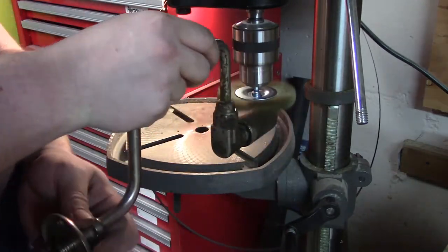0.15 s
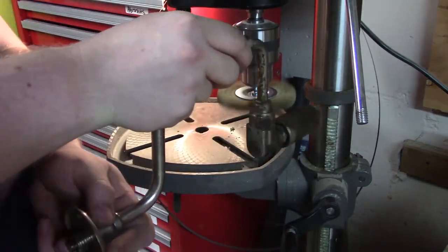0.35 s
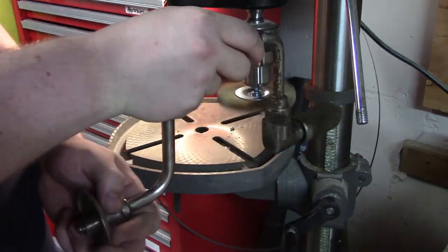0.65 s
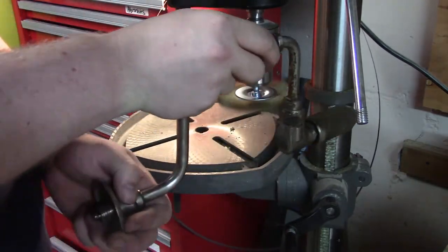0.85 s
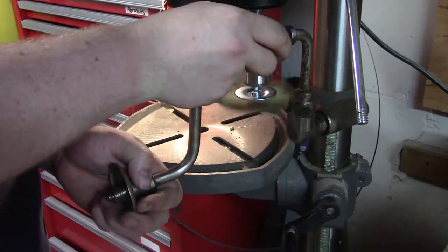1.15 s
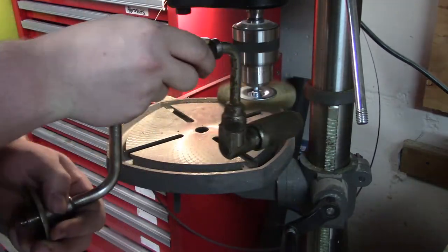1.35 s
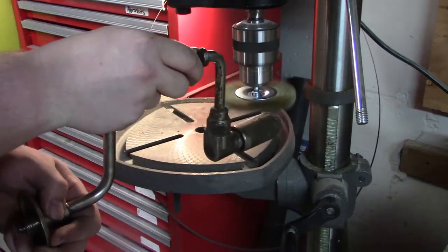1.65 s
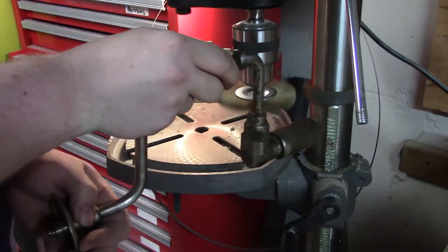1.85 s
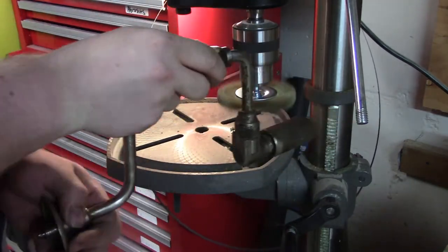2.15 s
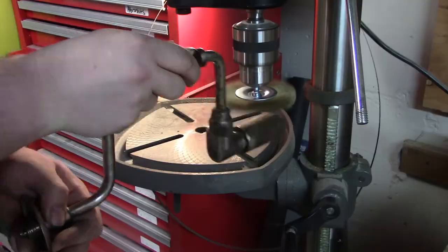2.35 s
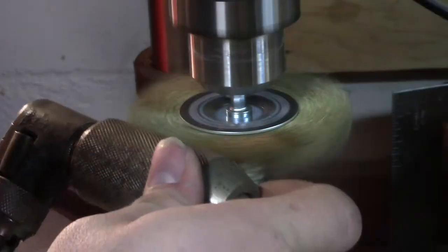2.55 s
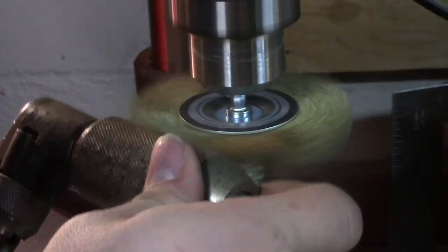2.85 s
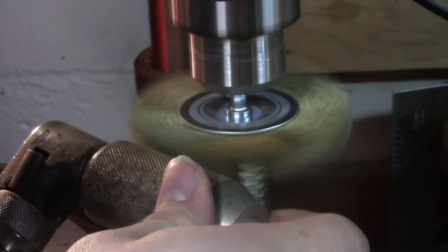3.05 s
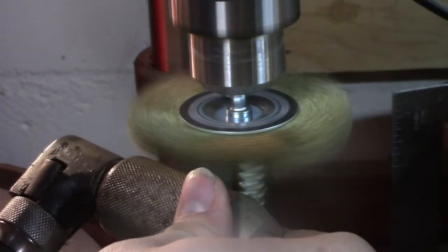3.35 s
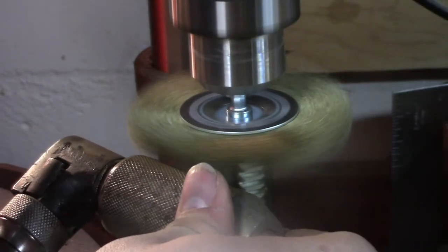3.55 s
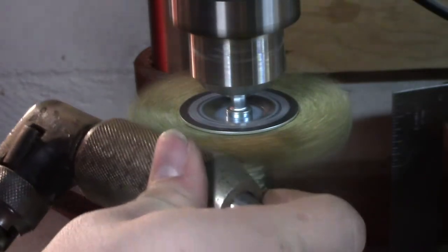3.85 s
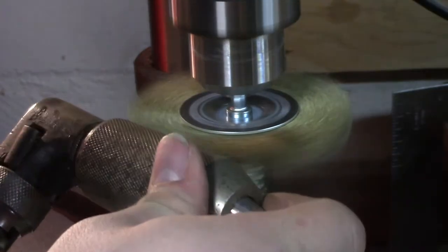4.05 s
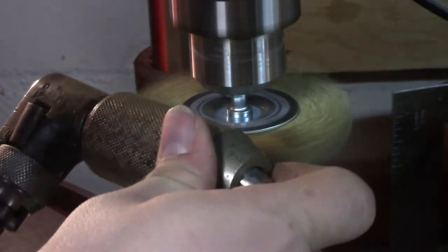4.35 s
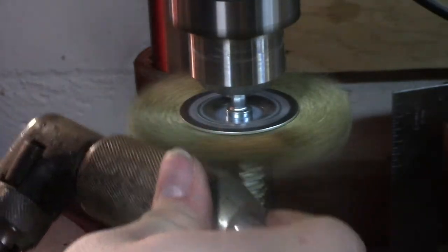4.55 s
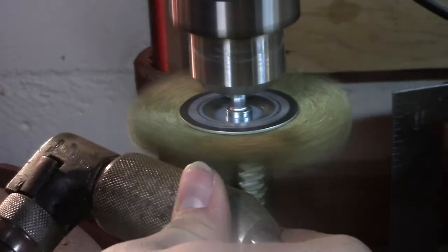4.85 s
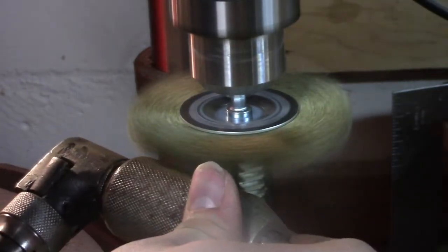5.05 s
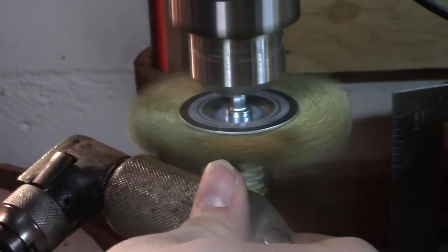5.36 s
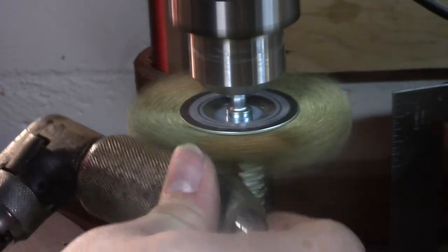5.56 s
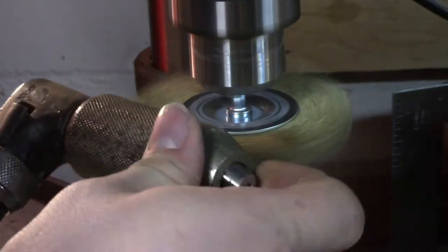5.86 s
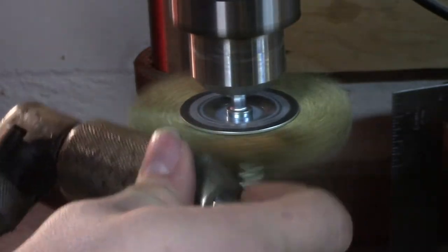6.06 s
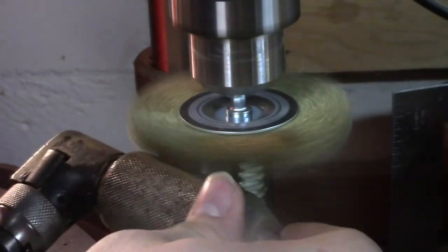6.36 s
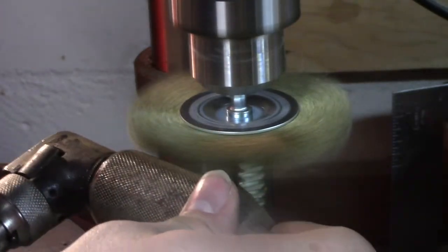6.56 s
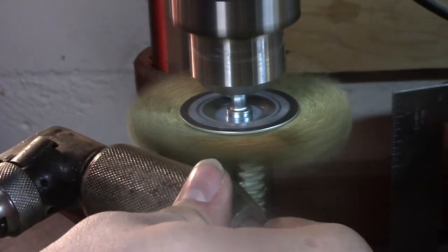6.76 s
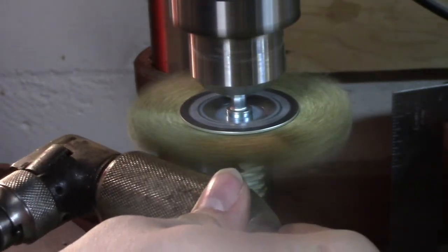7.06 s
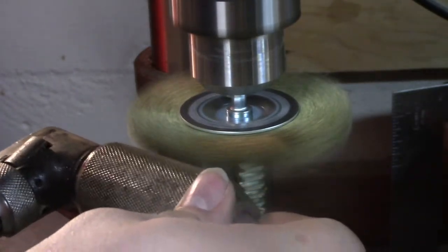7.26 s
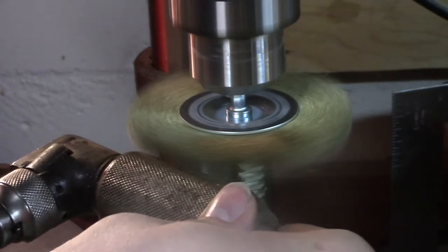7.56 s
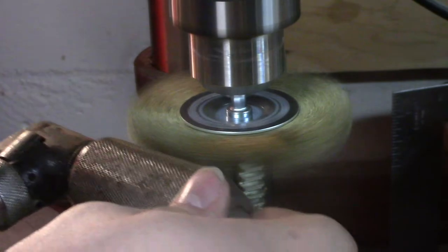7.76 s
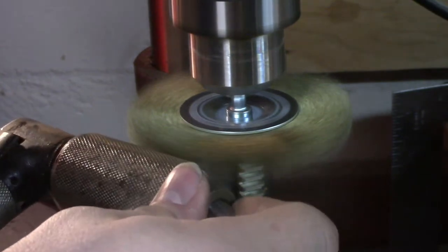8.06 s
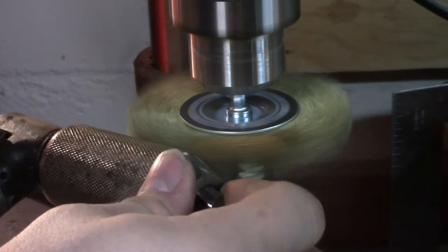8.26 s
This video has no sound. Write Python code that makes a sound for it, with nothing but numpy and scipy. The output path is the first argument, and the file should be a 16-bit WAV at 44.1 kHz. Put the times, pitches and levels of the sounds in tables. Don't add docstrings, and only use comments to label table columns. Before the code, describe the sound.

From 0 to 2.5 s, a drill press with a spinning brush wheel against a steel tool is heard sped up almost five times: a loud, shrill, dense metallic rattle and whirr, strongest around 3 to 5.5 kHz, with fluttering surges, brief dips and small hard ticks. At 2.5 s it cuts instantly to normal speed, closer, lower and softer. Contact is light until about 2.7 s, then the uneven wheel knocks rapidly, roughly thirty turns a second, making the frame hum, head rattle and chuck clatter beneath a bright bristle hiss. The scraping thins near 2.9, 4.1, 4.6 and 5.6 s; shoves swell the rattle around 4.4, 6.0, 6.8 and 7.35 s. At 6.2 s contact nearly lifts, then returns rougher. A very faint high whistle comes and goes, clearer near 8 s. It continues, slightly eased, to the end at 8.4 s, with short workshop echo.

```python
import sys
import numpy as np
from scipy import signal
from scipy.fft import rfft, irfft
from scipy.io import wavfile
from scipy.ndimage import uniform_filter1d, map_coordinates

SR = 44100
rng = np.random.default_rng(int(sys.argv[2]) if len(sys.argv) > 2 else 0)


def dump_mix(stems):
    frames = np.atleast_2d(stems).T
    limited = np.clip(frames, -1, 1)
    pcm = np.round(limited * 32767).astype(np.int16)
    wavfile.write(sys.argv[1], SR, pcm)


def volts_from_decibels(level):
    exponent = np.asarray(level, float) / 20
    return 10 ** exponent


N = 370440
TIME = np.arange(N) / SR
CUT_S = 2.506
LAPSE = 4.83
LAPSE_TOOL_HZ = 5780

# pitch in Hz, width in Hz, level in dB.
LAPSE_HEAD_MODES = [(1890, 120, -14), (2165, 50, -10.5), (2330, 100, -16), (2460, 70, -14),
                    (2888, 35, -6.5), (3194, 105, -6), (3465, 99, -5), (3880, 130, -13), (4120, 40, -13),
                    (4192, 35, -11), (4396, 70, -.5), (4520, 120, -6), (4738, 28, -8), (5098, 60, -4),
                    (5265, 75, -7), (5494, 35, -8), (5620, 80, -15), (6140, 81, -14), (6480, 245, -14),
                    (6880, 162, -12), (7710, 45, -15), (7930, 125, -18), (8400, 77, -14), (8860, 543, -16),
                    (9320, 109, -14), (9430, 62, -14), (10210, 95, -17), (11670, 231, -23),
                    (12210, 45, -17), (12630, 70, -18), (13600, 234, -27), (14090, 263, -24),
                    (14910, 189, -20)]
# pitch in Hz, level in dB per Hz.
LAPSE_HEAD_BROAD = [(1000, -48), (1650, -24), (1900, -15), (2450, -17), (2600, -21), (3000, -13),
                    (3700, -17), (4200, -19), (5000, -8), (5700, -18), (7200, -18), (8200, -26),
                    (9700, -22), (10600, -25), (12000, -21), (14000, -27), (15700, -22)]


def unit(x):
    return x / np.sqrt(np.mean(x ** 2) + 1e-20)


def along(points, hz):
    f, v = np.transpose(points)
    return np.interp(np.log(hz + 1), np.log(f + 1), v)


def curve(rows):
    s, value = np.transpose(rows)
    return np.interp(TIME, s, value)


def wobble(rate):
    knots = rng.standard_normal(int(N * rate / SR) + 4)
    return map_coordinates(knots, [np.arange(N) * rate / SR])


def swells(rows):
    t = np.arange(0, N / SR, .002)
    bumps = sum(db * np.exp(-(2 * (t - s) / length) ** 2) for s, db, length in rows)
    return np.interp(TIME, t, bumps)


def below(x, edge_hz):
    return irfft(rfft(x) / (1 + (np.fft.rfftfreq(N, 1 / SR) / edge_hz) ** 20), N)


def tilted(x, tilt_db):
    low = below(x, 7300)
    return volts_from_decibels(0.58 * tilt_db) * low + volts_from_decibels(-tilt_db) * (x - low)


def sooner(knocks, lead_s):
    return np.roll(knocks, -round(lead_s * SR))


def uneven(knocks, db):
    return knocks * volts_from_decibels(db * rng.standard_normal(N))


def body(x, modes, bed):
    m = 2 ** 15
    hz = np.fft.rfftfreq(m, 1 / SR)
    power = volts_from_decibels(2 * along(bed, hz))
    for center, width, db in modes:
        power = power + volts_from_decibels(2 * db) / (1 + (2 * (hz - center) / width) ** 2) ** 1.5
    cepstrum = irfft(np.log(power) / 2, m)
    cepstrum[1:m // 2] *= 2
    cepstrum[m // 2 + 1:] = 0
    ring = irfft(np.exp(rfft(cepstrum)), m)[:m // 2]
    return unit(signal.fftconvolve(x, ring)[:N])


def bursts(strength, fall_s, rise_s):
    opened = signal.lfilter([1], [1, -np.exp(-1 / (rise_s * SR))], strength)
    return signal.lfilter([1], [1, -np.exp(-1 / (fall_s * SR))], opened)


def bites(spots, slip, speed, snags, scatter_db, snag_db):
    turns_hz = 31.93
    turns = speed * turns_hz * TIME + curve(slip)
    mood_db = scatter_db * wobble(19 * speed)
    out = np.zeros(N)
    for place, db in spots:
        at = np.flatnonzero(np.diff(np.floor(turns - place)))
        out[at] = volts_from_decibels(db + mood_db[at] + 1.4 * rng.standard_normal(N)[at])
    lead_s, clears_s = .0015, .009
    near = round(clears_s / speed * SR)
    for s, db in snags:
        at = round((s - lead_s / speed) * SR)
        out[at - near // 3:at + near] = 0
        out[at] = volts_from_decibels(np.clip(db + snag_db, -9, 6))
    return out


def shaken(knocks, fall_s, rise_s, steady, grit_db, crack=0, speed=1):
    force = steady + unit(bursts(knocks, fall_s, rise_s))
    force = force + crack * unit(bursts(knocks, .0015 / speed, 1 / SR))
    return force * volts_from_decibels(grit_db * rng.standard_normal(N)) * rng.standard_normal(N)


def level(hand, db, by_lean, by_shove, by_ease=0):
    lean_db, shove_db, ease_db = hand
    return volts_from_decibels(db + by_lean * lean_db + by_shove * shove_db - by_ease * ease_db)


def motor(speed, db):
    return volts_from_decibels(db + 0.8 * wobble(4 * speed)) * np.sin(2 * np.pi * 120 * speed * TIME)


def lapse_hand():
    # time in seconds, force in dB.
    lean = [(0, -0.5), (.12, -0.5), (.19, 0), (1.4, 0), (1.6, 0), (2.4, 0), (2.5, -1)]
    # middle in seconds, force in dB, length in seconds.
    shoves = [(.35, 19, 0.013), (.415, -8, 0.011), (.57, -11, 0.027), (.66, -3, 0.08), (.82, 7, 0.076),
              (1.1, 10, 0.041), (1.15, -4, 0.044), (1.3, 8, 0.028), (1.4, 11, 0.05), (1.733, 19, 0.02),
              (1.82, 16, 0.04), (1.875, -10, 0.018), (1.7, 1, 0.036), (1.47, -4, .05), (1.94, -4, .06),
              (2.0, 12, 0.022), (2.05, -20, 0.011), (2.135, -13, 0.028), (2.256, 12, .012), (2.285, 4, .04),
              (2.335, -4, 0.014), (2.379, 9, .01), (2.405, 5, .012), (2.318, 6, .02), (2.235, 0, 0.014),
              (.9, 7, 0.044), (1.57, -3, .04), (2.42, 8, .015), (2.435, -16, 0.013)]
    return curve(lean), swells(shoves), 0


def lapse_knocks():
    # place in the turn from 0 to 1, level in dB.
    spots = [
        (.63, -4),
        (.77, 0),
        (.16, -9),
    ]
    # time in seconds, turns gained on the mean speed.
    slip = [(0, .17), (1.2, .13), (2, .02), (2.3, .1), (2.5, .04)]
    # time in seconds, peak in dB.
    snags = [(0.043, -26.5), (0.0817, -27), (0.1193, -27), (0.1393, -17), (0.18, -11), (0.191, -21),
             (0.216, -18), (0.2445, -19), (0.2887, -25), (0.3272, -19), (0.3461, -20), (0.4581, -25),
             (0.477, -21), (0.5803, -9), (0.613, -23), (0.671, -25), (0.6975, -22), (0.7147, -21),
             (0.764, -31), (0.787, -21), (0.833, -17), (0.9517, -21), (1.0744, -28), (1.092, -20),
             (1.1493, -30), (1.17, -17), (1.2103, -11), (1.282, -21), (1.2987, -25), (1.497, -23),
             (1.5197, -24), (1.555, -33), (1.6337, -15), (1.728, -19), (1.805, -20), (1.8773, -22),
             (1.9694, -22), (1.9926, -29), (2.028, -19), (2.0602, -22), (2.1096, -28), (2.146, -20),
             (2.2297, -20), (2.252, 10), (2.3391, -25), (2.376, -19.5), (2.403, -21), (2.4434, -16),
             (2.4986, -15)]
    return bites(spots, slip, LAPSE, snags, scatter_db=1.4, snag_db=26)


def lapse_hum(knocks):
    # pitch in Hz, width in Hz, level in dB.
    modes = [(417, 8, -22.5), (619, 14, -15), (733, 8, 4), (772, 14, -6), (880, 30, -7), (975, 25, -5),
             (1020, 30, -5), (1110, 40, -7), (1227, 50, 0), (1390, 35, -4)]
    # pitch in Hz, level in dB per Hz.
    bed = [(30, -81), (250, -40.5), (380, -37), (520, -28.5), (670, -18), (800, -12), (1300, -5),
           (1620, -13.5), (2200, -16.5), (3500, -20), (7000, -39)]
    early = sooner(knocks, .008 / LAPSE)
    push = shaken(early ** 0.13, 0.00092, 0.000083, 1.0, grit_db=0.8)
    return body(push * volts_from_decibels(0.75 * wobble(40.26)), modes, bed)


def lapse_rattle(knocks):
    taps = knocks ** 0.65 * np.sign(rng.standard_normal(N))
    push = shaken(knocks ** .75, .0012, .0003, .33, grit_db=.4, crack=.06, speed=LAPSE)
    rattle = body(push + 4.5 * taps, LAPSE_HEAD_MODES, LAPSE_HEAD_BROAD)
    return below(rattle, LAPSE_TOOL_HZ)


def lapse_clatter(knocks):
    # middle in seconds, tilt in dB,
    # length in seconds.
    rim = [(.05, 2.5, 0.19), (.33, -1, .06), (.45, 1.5, .08), (.95, 2, 0.17), (1.25, 0.5, 0.29),
           (1.5, 0.5, .08), (1.62, 2, 0.068), (1.78, -0.5, .12), (2.3, -3, .12), (2.44, 4.5, 0.027),
           (2.48, 1, 0.018)]
    push = shaken(sooner(knocks, 0.00026) ** 1.55, 0.002, 0.00078, 1.0, grit_db=2.0)
    clatter = body(push * volts_from_decibels(0.83 * wobble(60)), LAPSE_HEAD_MODES, LAPSE_HEAD_BROAD)
    return tilted(unit(clatter - below(clatter, LAPSE_TOOL_HZ)), swells(rim))


def press_lapse():
    hand = lapse_hand()
    knocks = lapse_knocks()
    hum = level(hand, db=-41.5, by_lean=2.4, by_shove=0.09) * lapse_hum(knocks)
    rattle = level(hand, db=-34, by_lean=3.5, by_shove=0.23) * lapse_rattle(knocks)
    clatter = level(hand, db=-41.5, by_lean=3, by_shove=0.38) * lapse_clatter(knocks)
    return hum + rattle + clatter + motor(LAPSE, db=-65.5)


def normal_hand():
    # time in seconds, force in dB.
    lean = [(2.5, -2), (3.5, -2.5), (3.9, -1), (5.3, -2), (6.5, 1.5), (7.1, 0), (8.4, 3)]
    # middle in seconds, force in dB, length in seconds.
    shoves = [(2.59, -12, 0.035), (2.66, -18, 0.023), (2.75, -0.5, 0.071), (2.99, -8.5, 0.035),
              (3.27, -9, 0.026), (3.3, 12, 0.014), (3.395, -11, 0.034), (3.71, 7.5, 0.027),
              (3.89, 2.5, 0.1), (4.44, 11.5, .06), (4.05, 0.5, 0.048), (4.14, -0.5, 0.071), (6.8, 0, 0.025),
              (4.52, -5, 0.041), (4.85, 4, 0.048), (4.33, 4.5, 0.18), (5.61, -1, 0.036), (5.72, 4.5, 0.16),
              (6.04, 10.5, 0.066), (5.96, 6.5, 0.058), (6.2, -5, 0.55), (6.41, 8.5, 0.043),
              (6.8, -9, 0.019), (6.75, 7, 0.09), (6.845, 11.5, 0.048), (6.6, -2.5, 0.1), (2.8, 0, 0.055),
              (3.25, 0, 0.05), (3.95, 2.5, 0.069), (4.9, 1.5, 0.41), (5.55, 2, 0.19), (5.87, -3, 0.088),
              (7.5, -3, 0.12), (7.05, -6, 0.016), (7.25, 4, 0.02), (7.35, 12.5, 0.035), (7.66, 2, 0.044),
              (7.75, 0.5, 0.037), (7.94, 2, 0.047), (8.12, -8, 0.068), (8.2, 0, 0.084), (8.31, -11, 0.043)]
    # middle in seconds, lost contact in dB, length in seconds.
    eases = [(2.62, 31, 0.23), (2.91, 16, 0.21), (3.2, 7, 0.073), (3.89, 6.5, 0.18), (4.1, 12, 0.082),
             (4.23, 10, 0.084), (4.57, 8, 0.13), (5.63, 8, .12), (5.85, 2, 0.16), (6.21, 27, .13),
             (6.98, 5, 0.072), (7.21, 5.5, 0.063), (8.04, 6.5, 0.41), (8.29, 11, 0.17)]
    return curve(lean), swells(shoves), swells(eases)


def normal_knocks():
    # place in the turn from 0 to 1, level in dB.
    spots = [
        (.63, 0),
        (.88, -1),
        (.12, -5),
    ]
    # time in seconds, turns gained on the mean speed.
    slip = [(2.5, .11), (3.3, .05), (4.3, .16), (4.8, .11), (5.8, .19), (6.3, .2), (6.8, .27), (7.5, .25),
            (8.4, .19)]
    # time in seconds, peak in dB.
    snags = [(2.677, -27), (2.717, -25), (2.747, -24), (3.036, -24), (3.124, -24), (3.284, -19),
             (3.416, -24), (3.599, -24), (3.692, -26), (3.846, -23.5), (3.875, -24), (3.907, -28),
             (3.97, -32), (4.061, -20), (4.18, -25), (4.249, -25), (4.408, -36), (4.431, -24), (4.538, -25),
             (4.694, -24), (4.82, -29), (4.843, -23), (4.911, -25), (5.003, -29), (5.034, -28),
             (5.255, -21), (5.324, -36), (5.437, -17), (5.531, -27), (5.636, -24.5), (5.847, -15),
             (6.03, -24), (6.283, -31), (6.322, -33), (6.356, -27), (6.404, -18.5), (6.474, -23),
             (6.572, -27), (6.627, -24), (6.659, -23), (6.717, -25), (6.749, -18), (6.81, -22),
             (6.841, -23), (6.97, -22), (7.012, -31), (7.063, -23), (7.158, -20), (7.228, -25),
             (7.313, -32), (7.342, -24), (7.467, -24), (7.593, -22), (7.656, -22), (7.727, -24.5),
             (7.845, -25), (7.945, -22), (8.009, -25), (8.138, -23), (8.348, -24)]
    return bites(spots, slip, 1, snags, scatter_db=-0.03, snag_db=31.0)


def first_push(knocks):
    return bursts(knocks, 0.000092, .0001)


def frame_hum(knocks):
    # pitch in Hz, width in Hz, level in dB.
    modes = [(121, 14, -32), (152, 5, -4), (177, 11, -14), (228, 28, -3), (262, 31, -7), (296, 44, -10),
             (391, 32, -4.5), (445, 36, -1), (504, 55, -13), (596, 40, -9), (629, 30, -10), (662, 14, -6),
             (782, 60, -12)]
    # pitch in Hz, level in dB per Hz.
    bed = [(25, -32), (70, -41), (110, -36), (140, -20), (200, -12), (340, -19), (540, -17.5), (800, -17.5),
           (1100, -34), (2000, -68.5), (6000, -93)]
    early = sooner(knocks, .004)
    push = shaken(uneven(early, db=2) ** 0.95, 0.015, 0.0056, 1.4, grit_db=1.5)
    return body(push * volts_from_decibels(0.16 * wobble(12)), modes, bed)


def head_rattle(knocks):
    # pitch in Hz, width in Hz, level in dB.
    modes = [(600, 50, -13), (690, 40, -7), (722, 20, -9), (790, 60, -11), (875, 20, -8), (911, 28, 1),
             (997, 42, -2), (1070, 70, -10)]
    # pitch in Hz, level in dB per Hz.
    bed = [(200, -55), (600, -34), (850, -20), (1100, -20), (1500, -45), (5000, -90)]
    push = shaken(uneven(knocks ** .75, db=.8), .0065, .0015, .06, grit_db=1.1, crack=.18)
    return body(push * volts_from_decibels(.5 * wobble(18)) + .28 * first_push(knocks), modes, bed)


def quill_jangle(knocks):
    # pitch in Hz, width in Hz, level in dB.
    modes = [(1128, 35, 0), (1206, 30, -4), (1250, 35, -6), (1305, 50, -4), (1360, 30, -7), (1410, 40, -5),
             (1453, 22, -1)]
    # pitch in Hz, level in dB per Hz.
    bed = [(500, -45), (1000, -16), (1400, -14), (1500, -24), (1900, -30), (5000, -75)]
    push = shaken(uneven(knocks ** .8, db=1.8), .008, .0009, .5, grit_db=1.1, crack=.25)
    return body(push * volts_from_decibels(1.2 * wobble(15)) + .25 * first_push(knocks), modes, bed)


def tool_clatter(knocks):
    # pitch in Hz, width in Hz, level in dB.
    modes = [(1620, 113, -20), (1685, 30, -19), (1775, 35, -18), (1960, 30, -21), (2040, 60, -22),
             (2398, 70, -16), (2540, 57, -15), (2700, 90, -21), (2880, 200, -18), (3230, 82, -17),
             (3620, 166, -12), (3800, 130, -11.5), (3880, 33, -13), (4010, 90, -16.5), (4350, 200, -20),
             (4700, 420, -23)]
    # pitch in Hz, level in dB per Hz.
    bed = [(600, -45), (1300, -32), (1520, -24), (2200, -23), (3000, -25), (3450, -22), (4200, -23),
           (5200, -31), (7000, -47), (16000, -72)]
    early = sooner(knocks, .001)
    push = shaken(uneven(early ** .85, db=1.8), .008, .0005, .72, grit_db=1.2, crack=.25)
    return body(push * volts_from_decibels(.8 * wobble(18)) + .22 * first_push(knocks), modes, bed)


def bristle_hiss(soft, ease_db):
    # pitch in Hz, width in Hz, level in dB.
    modes = [(5510, 188, -8), (5970, 255, -7), (6400, 512, -2), (6660, 54, -1), (7160, 190, -3),
             (7710, 633, 0), (8120, 101, -1), (9060, 56, -2), (9620, 54, -5), (10200, 700, -8),
             (12500, 165, -12)]
    # pitch in Hz, level in dB per Hz.
    bed = [(1500, -35), (4000, -12), (5800, -28), (7000, -4), (8300, -6), (9500, -4.5), (10600, -11),
           (12000, -8), (13500, -15), (15700, -23)]
    # middle in seconds, tilt in dB, length in seconds.
    rim = [
        (2.75, 0.5, .4),
        (4.0, 1.5, 0.35),
        (4.4, 4, 0.3),
        (4.43, -2.5, 0.11),
        (5.75, 1, 0.24),
        (6.05, 1, 0.3),
        (8.2, 1, .5),
    ]
    contact = 1.33 * volts_from_decibels(-0.86 * ease_db)
    push = shaken(soft, .007, .002, contact, grit_db=2)
    return tilted(body(push * volts_from_decibels(.9 * wobble(18)), modes, bed), swells(rim))


def tool_whistle(soft, ease_db):
    # middle in seconds, extra dB, length in seconds.
    sings = [
        (3.5, 14, 0.4),
        (4.3, 12, .5),
        (4.95, 15, 0.59),
        (6.05, 16, 0.34),
        (6.65, 15, .35),
        (7.3, 8, 0.65),
        (7.93, 20, .45),
        (8.35, 18, 0.7),
    ]
    whistle = body(shaken(soft, .011, .003, .8, grit_db=1.1), [(11790, 90, 0)], [(100, -60)])
    cleared_db = 1.5 * (TIME - CUT_S)
    return volts_from_decibels(-87 + cleared_db - 0.72 * ease_db + swells(sings)) * whistle


def grip_rake(soft):
    # pitch in Hz, width in Hz, level in dB.
    modes = [(8000, 490, -9), (9000, 600, 3.5), (9620, 560, 3.5)]
    # time in seconds, level in dB.
    rakes = [(2.5, -75), (2.95, -62), (3.1, -56.5), (3.8, -55), (3.9, -66), (4.6, -62), (4.7, -55.5),
             (5.55, -53), (5.65, -65), (6.25, -67), (6.35, -53), (7.95, -54), (8.05, -62), (8.4, -59)]
    push = shaken(soft, 0.008, .002, 2.1, grit_db=-2.0)
    return volts_from_decibels(curve(rakes)) * body(push * volts_from_decibels(1.1 * wobble(25)), modes, [(100, -43)])


def press():
    hand = normal_hand()
    ease_db = hand[2]
    knocks = normal_knocks()
    soft = knocks ** 0.19
    hum = level(hand, db=-42.5, by_lean=0.79, by_shove=0.29, by_ease=0.04) * frame_hum(knocks)
    rattle = level(hand, db=-42.5, by_lean=0.8, by_shove=0.46, by_ease=0.18) * head_rattle(knocks)
    jangle = level(hand, db=-51, by_lean=0.86, by_shove=0.8) * quill_jangle(knocks)
    clatter = level(hand, db=-46.5, by_lean=1, by_shove=0.61, by_ease=0.16) * tool_clatter(knocks)
    hiss = level(hand, db=-48, by_lean=0.67, by_shove=0.18, by_ease=0.12) * bristle_hiss(soft, ease_db)
    brush = hiss + tool_whistle(soft, ease_db) + grip_rake(soft)
    return hum + rattle + jangle + clatter + brush + motor(1, db=-82)


def shop(x, speed, wet_db, unlike_db):
    # pitch in Hz, seconds to fall by 60 dB.
    ring_times = [(200, 0.41), (2000, 0.98), (12000, 0.013)]
    # pitch in Hz, level in dB below their common sound.
    unlike = [(60, -42), (125, -32), (250, -47), (500, -29.5), (1000, -26.5), (2380, -26), (4400, -22),
              (8120, -19), (13000, -19)]
    hz, t, z = signal.stft(rng.standard_normal(SR // 2), SR, nperseg=256)
    fading = volts_from_decibels(-60 * t * speed / along(ring_times, hz / speed)[:, None])
    tail = signal.istft(z * fading, SR, nperseg=256)[1]
    wet = volts_from_decibels(wet_db) * signal.fftconvolve(x, tail / np.linalg.norm(tail))[:N]

    hz, t, z = signal.stft(x, SR, nperseg=512)
    patches = uniform_filter1d(rng.standard_normal(z.shape), size=4, axis=0)
    patches = uniform_filter1d(patches, size=6, axis=1)
    side_db = along(unlike, hz)[:, None] + unlike_db + 4.6 * unit(patches) - 4.5
    scramble = np.exp(2j * np.pi * rng.random(z.shape)) * volts_from_decibels(side_db)
    side = signal.istft(z * scramble, SR, nperseg=512)[1][:N]
    return x + wet + side * np.array([[1], [-1]])


def scene():
    fade = np.clip((TIME - CUT_S) / 0.0039 + .5, 0, 1)
    fast = shop(press_lapse(), LAPSE, wet_db=-20, unlike_db=-8)
    normal = shop(press(), 1, wet_db=-17, unlike_db=3)
    return (1 - fade) * fast + fade * normal


def top_cut(x):
    return signal.sosfilt(signal.butter(12, 16580, fs=SR, output="sos"), x)


def record(dry):
    kept = irfft(rfft(dry) * (np.fft.rfftfreq(N, 1 / SR) < 15740), N)
    return top_cut(kept)


dry = scene()
out = record(dry)
dump_mix(out)
```